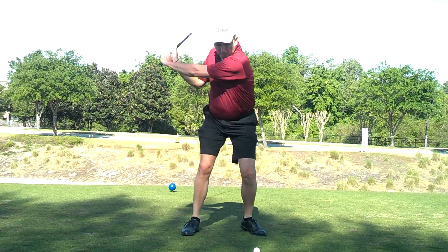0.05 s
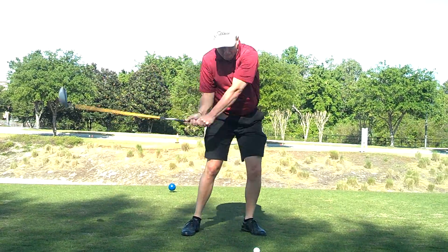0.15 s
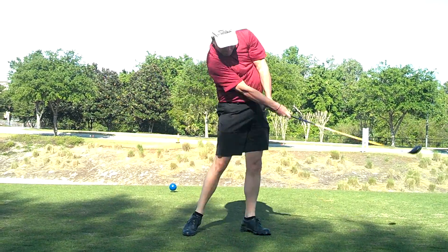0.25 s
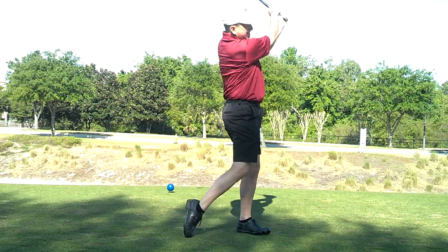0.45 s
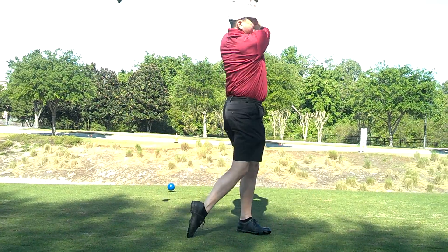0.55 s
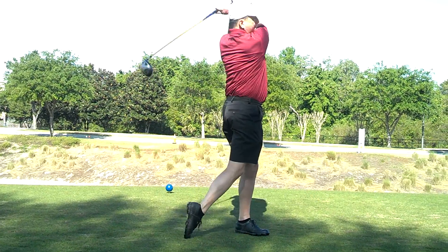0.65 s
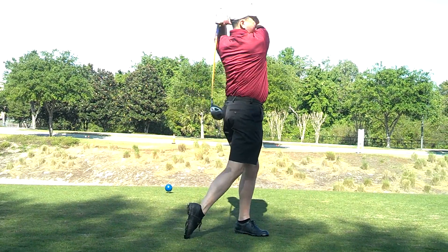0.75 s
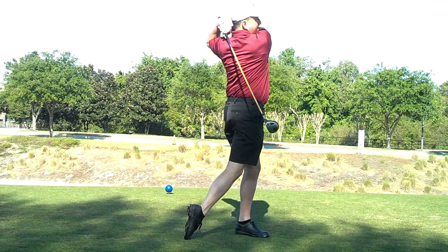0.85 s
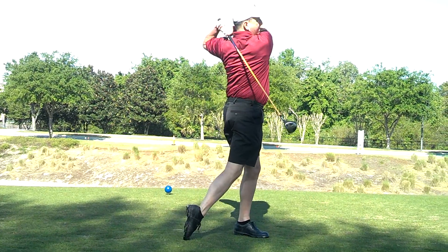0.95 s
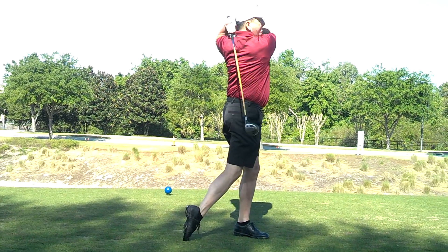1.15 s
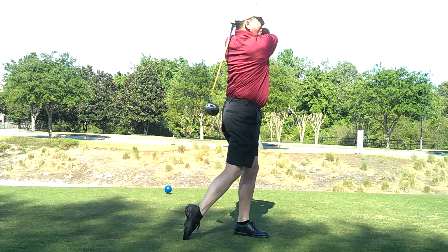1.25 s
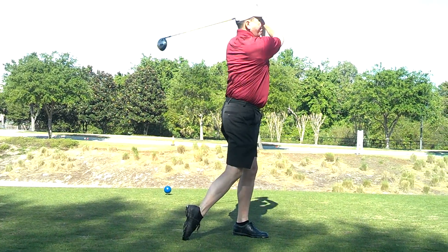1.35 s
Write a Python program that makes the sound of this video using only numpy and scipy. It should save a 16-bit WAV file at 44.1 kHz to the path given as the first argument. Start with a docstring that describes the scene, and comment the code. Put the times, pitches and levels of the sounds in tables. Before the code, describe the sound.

Sharp crack of a golf drive after a quick swish, with a light breeze behind.

```python
"""Golf drive off the tee

The club whooshes down as shaft and head shed vortices, the face cracks against the ball and the
hollow metal head rings briefly; turf and trees scatter the crack. Underneath sit a faint breeze,
two soft puffs of air on the microphone, the rustle of the golfer's shirt and a far bird."""
import sys
import numpy as np
from scipy import signal
from scipy.fft import rfft, irfft
from scipy.io import wavfile

SR = 44100
rng = np.random.default_rng(int(sys.argv[2]) if len(sys.argv) > 2 else 0)


def wrap_up_sound(samples):
    """Save the sound to the file named by the first command line argument, as 16-bit audio."""
    columns = np.atleast_2d(samples).T
    # keep every value between -1 and 1, then stretch to whole-number steps
    tamed = np.clip(columns, -1, 1)
    steps = np.round(tamed * 32767).astype(np.int16)
    wavfile.write(sys.argv[1], SR, steps)


N = 61739


def undb(db):
    """Decibels to gain."""
    return 10 ** (np.asarray(db) / 20)


def curve(rows, at):
    """Straight lines through the rows."""
    return np.interp(at, *np.array(rows, float).T)


def by_freq(rows):
    """A table read at every spectral bin, on a log-frequency axis."""
    hz, value = np.array(rows, float).T
    return np.interp(np.log(np.fft.rfftfreq(N, 1 / SR) + 1), np.log(hz), value)


def unit(x):
    """Scale to rms 1."""
    return x / np.sqrt(np.mean(np.abs(x) ** 2))


def pan(db):
    """Left and right gains for a level difference; positive leans left."""
    return undb(np.array([[db], [-db]]) / 2)


def diffuse(colour):
    """Coloured stereo noise at rms 1, partly shared between the channels."""
    # Each row: frequency in Hz, share of the power common to both channels.
    likeness = [(100, 0.8986), (280, 0.67), (550, 0.95), (1200, 0.81), (2200, 0.99), (4000, 0.561),
                (12000, 0.86)]
    # Each row: frequency in Hz, left minus right in dB.
    balance = [(60, -1), (130, 4), (240, 6), (360, -0.5), (520, -2), (1300, -2), (3500, -2.5),
               (12000, -2.5)]
    common, own = rfft(rng.standard_normal(N)), rfft(rng.standard_normal((2, N)))
    share = np.clip(by_freq(likeness), 0, 1)
    noise = np.sqrt(share) * common + np.sqrt(1 - share) * own
    db = by_freq(colour) + np.array([[.5], [-.5]]) * by_freq(balance)
    return unit(irfft(noise * undb(db), N))


def wander(width_hz):
    """Complex random drift of the given bandwidth, rms 1."""
    hz = np.fft.fftfreq(N, 1 / SR)
    noise = rng.standard_normal(N) + 1j * rng.standard_normal(N)
    return unit(np.fft.ifft(np.fft.fft(noise) * np.exp(-(hz / width_hz) ** 2)))


def wavering_tone(hz, width_hz, steady=.45):
    """A tone whose phase and strength wander; steady=1 holds the strength still."""
    drift = wander(width_hz)
    drift = unit(drift / (np.abs(drift) + 1e-9) ** steady)
    return np.sqrt(2) * np.real(drift * np.exp(2j * np.pi * np.cumsum(hz) / SR))


def swells(t, rows):
    """Bell-shaped envelopes from rows of peak time, half-width and level."""
    return sum(undb(db) * np.exp(-((t - at) / half_width) ** 2) for at, half_width, db in rows)


def burst(age, rise_s, t60_s):
    """Smooth attack, then exponential decay."""
    attack = np.sin(np.pi / 2 * np.clip(age / rise_s, 0, 1)) ** 2
    return attack * np.exp(-np.log(1000) * np.maximum(age - rise_s, 0) / t60_s)


def breeze(t, split_hz=2500, flicker_db=.5, hiss_follow=.79):
    """Wind in the trees: a soft roar that sinks and swells, under a steadier hiss of leaves."""
    # Each row: frequency in Hz, relative noise density in dB.
    colour = [(25, -34), (50, -16), (100, 3), (200, 1), (300, -1), (390, -7), (520, 4), (680, 0),
              (850, -3.5), (1500, -6.5), (2100, -15.5), (2700, -19.5), (4100, -23), (5400, -30),
              (6800, -27.5), (8300, -32), (9700, -31), (11200, -38), (12500, -34.5), (14000, -49.5),
              (16000, -46.5)]
    # Each row: time in seconds, level in dB.
    fader = [(0, -50.5), (.1, -50), (.18, -49), (.31, -58), (.4, -59.5), (.8, -58), (1.1, -56), (1.4, -53)]
    air = diffuse(colour)
    roar = signal.sosfiltfilt(signal.butter(2, split_hz, fs=SR, output="sos"), air)
    hiss = air - roar
    roar_db = curve(fader, t) + flicker_db * wander(12).real
    hiss_db = roar_db.mean() + hiss_follow * (roar_db - roar_db.mean())
    return roar * undb(roar_db) + hiss * undb(hiss_db)


def buffets(t, hz=114):
    """Low, soft puffs of air hit the microphone."""
    # Each row: peak time in seconds, half-width in seconds, level in dB.
    puffs = [(0.047, 0.022, -42.5), (0.114, .02, -38.5)]
    return swells(t, puffs) * wavering_tone(np.full(N, hz), width_hz=28) * pan(db=-3)


def shirt(t):
    """Cloth rustles faintly as the body turns into the downswing and the follow-through."""
    # Each row: peak time in seconds, half-width in seconds, level in dB.
    rustles = [(0.079, .08, -76), (0.46, 0.06, -73)]
    # Each row: frequency in Hz, relative noise density in dB.
    colour = [(800, -10.5), (2800, -4.5), (4000, 1), (7000, -2.5), (10000, -13), (16000, -20.5)]
    return swells(t, rustles) * diffuse(colour)


def swing(t, rush_db=-37, rush_growth=4.2):
    """The whoosh: vortex tones off shaft and head rise with club speed, in a rush of turbulent air."""
    # Each row: time in seconds, club speed as a share of full speed.
    club_speed = [(.12, .3), (.192, 0.51), (.199, .73), (.208, 0.71), (.221, .86), (.237, .95),
                  (.248, 1.03), (.259, .98), (.268, .7), (.29, .64), (.303, .42), (.4, .2)]
    # Vortex tones at full speed. Each row: pitch in Hz, width in Hz, level in dB,
    # then the powers of speed by which pitch and amplitude grow.
    vortices = [(732.7, 28, -31.5, .97, 4.7), (810, 55, -42.5, 0.93, 8), (535, 44, -40, .05, 3.3)]
    # Each row: frequency in Hz, relative noise density in dB.
    rush_colour = [(60, -6.5), (200, -7), (340, -6), (470, 1.5), (800, 0), (1100, -6.5), (2000, -11),
                   (2800, -13), (4200, -18), (5500, -21), (7000, -21.5), (9000, -30), (10500, -47),
                   (16000, -59)]
    speed = curve(club_speed, t)
    tones = sum(undb(db) * speed ** growth * wavering_tone(hz * speed ** glide, width, steady=.85)
                for hz, width, db, glide, growth in vortices)
    rush = undb(rush_db) * speed ** rush_growth * diffuse(rush_colour)
    return tones * pan(db=5) + rush


def strike(t, impact_s=.2627, contact_s=.0003572):
    """A split second of contact cracks the ball and rings the head; turf and trees scatter the hit."""
    # Broad, fast-damped modes of ball and face. Each row: pitch in Hz, level in dB, T60 in seconds.
    crack = [(1330, 0.5, 0.0015), (2000, -4, 0.0018), (3094, -5, 0.006), (6436, -4.5, .0034),
             (9130, -9.5, 0.0027), (10700, -8.5, .0028), (12500, -15, 0.0029), (15500, -20, .002)]
    # Ringing modes of the hollow head, with the same columns.
    ring = [(1437, -32.5, .05), (2100, -35, .055), (2345, -32.5, .045), (3400, -28.5, .04),
            (4966, -31.5, .055), (5230, -33, .08), (5930, -34, 0.052), (6105, -33.5, .06),
            (6272, -27.5, .062), (6640, -33.5, .055), (6930, -30, .05), (7390, -27.5, .085),
            (7510, -20.5, .05), (7876, -33, .043), (8950, -35.5, .07), (9157, -33.5, .066),
            (9305, -25, .045), (13700, -40, .04), (15050, -39.5, .05)]
    # Scatter off near turf and far trees. Each row: frequency in Hz, relative noise density in dB.
    turf_colour = [(300, -16.5), (600, -10), (1400, -2.5), (2200, -1.5), (2800, -5), (3400, -3.5),
                   (4100, -8.5), (5300, -3), (7400, -1.5), (8200, -4), (9300, 0), (11000, -16.5),
                   (12500, -8), (13700, -21.5), (15100, -14.5), (16500, -36)]
    tree_colour = [(300, -6.5), (1400, 1), (2700, -6.5), (3800, -4.5), (5200, -1.5), (7000, 1.5),
                   (8300, -6.5), (9400, -2.5), (11000, -14), (12500, -8), (14000, -22.5), (16000, -29.5)]
    age = np.maximum(t - impact_s, 0)
    hit = sum(undb(db) * burst(age, contact_s, t60) * -np.sin(2 * np.pi * hz * age)
              for hz, db, t60 in crack + ring)
    turf = undb(-23.5) * burst(age, rise_s=.002, t60_s=.053) * diffuse(turf_colour)
    trees = undb(-47.5) * burst(age, rise_s=.015, t60_s=.24) * diffuse(tree_colour)
    return (hit + echoes(hit)) * pan(db=-3.5) + turf + trees


def echoes(hit):
    """Thin early reflections off the ground and things nearby: small surfaces mirror only treble."""
    # Each row: delay in seconds, level in dB, low-cut corner in Hz.
    reflections = [(.003, -21, 1201), (.0057, -23.5, 1200), (.0081, -21, 4984), (.0174, -23, 6000)]
    hz, spectrum = np.fft.rfftfreq(N, 1 / SR), rfft(hit)
    response = 0
    for delay_s, db, corner_hz in reflections:
        low_cut = 1j * hz / (corner_hz + 1j * hz)
        response += undb(db) * low_cut * np.exp(-2j * np.pi * hz * delay_s)
    return irfft(spectrum * response, N)


def bird(t, hz=3300):
    """A far bird gives three thin calls from the trees."""
    # Each row: peak time in seconds, half-width in seconds, level in dB.
    chirps = [(1.0, 0.019, -74), (1.21, 0.0094, -74), (1.26, 0.022, -75.5)]
    return swells(t, chirps) * wavering_tone(np.full(N, hz), width_hz=30)


def wide_microphone(left, right, lag_s=.000363):
    """The right channel arrives late and inverted, turning back towards in-phase in the low mids."""
    # Each row: frequency in Hz, extra phase lag in radians.
    extra_lag = [(130, .1), (300, .7), (550, 1.3), (1200, .2), (2200, -.2), (4000, 0)]
    phase_lag = 2 * np.pi * np.fft.rfftfreq(N, 1 / SR) * lag_s + by_freq(extra_lag)
    late_right = irfft(rfft(right) * np.exp(-1j * phase_lag), N)
    return np.array([left, -late_right])


def scene():
    """Whoosh and crack up front, the quiet course behind, all in wide stereo."""
    t = np.arange(N) / SR
    left, right = swing(t) + strike(t) + breeze(t) + buffets(t) + bird(t) + shirt(t)
    return wide_microphone(left, right)


def record(dry, ceiling=.95, low_cut_hz=61, high_cut_hz=16700):
    """Soft clipping rounds the peak of the crack; filters trim the deep bass and the very top."""
    rounded = ceiling * np.tanh(dry / ceiling)
    lean = signal.sosfilt(signal.butter(2, low_cut_hz, "high", fs=SR, output="sos"), rounded)
    return signal.sosfiltfilt(signal.ellip(8, .05, 60, high_cut_hz, fs=SR, output="sos"), lean)


dry = scene()
out = record(dry)
wrap_up_sound(out)
```